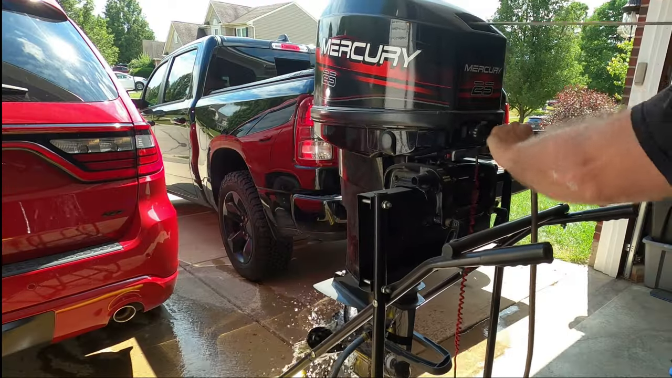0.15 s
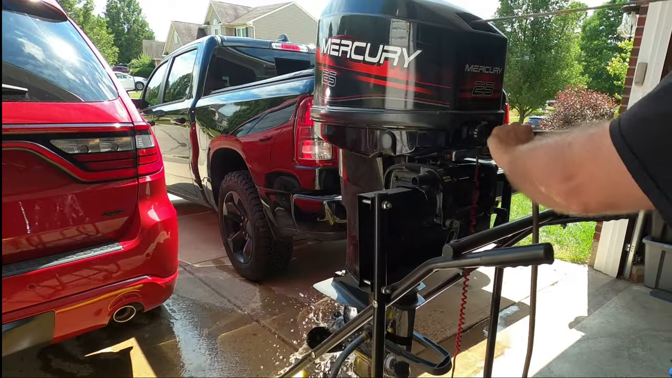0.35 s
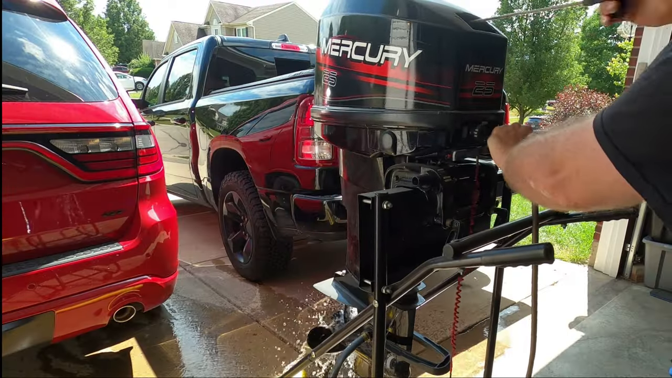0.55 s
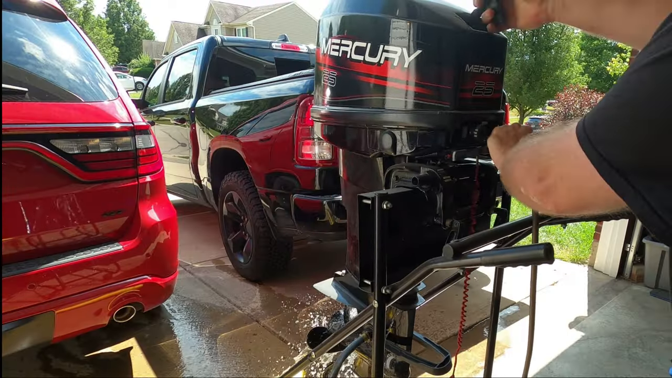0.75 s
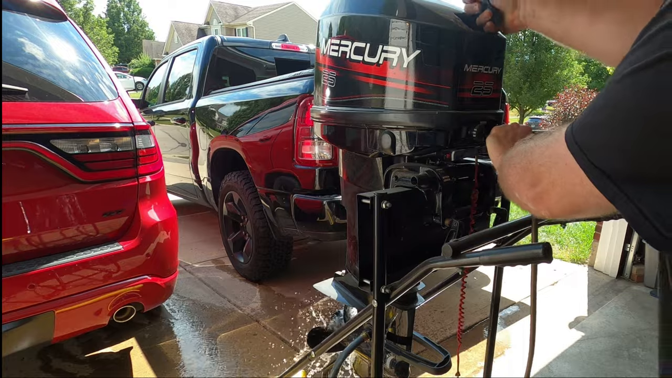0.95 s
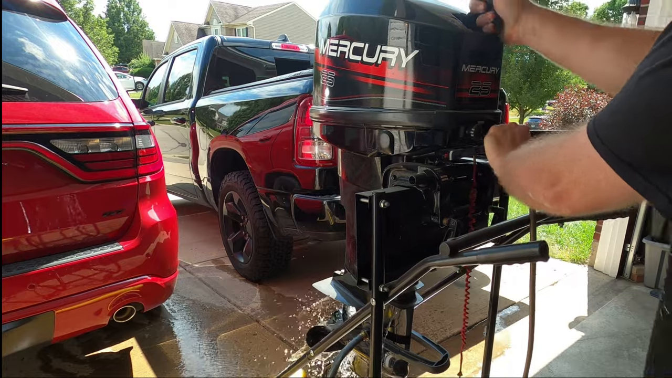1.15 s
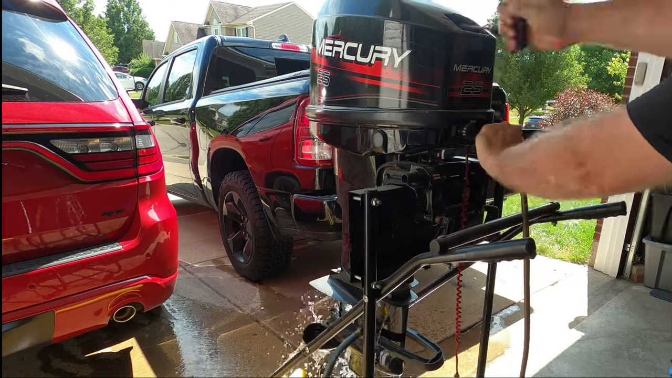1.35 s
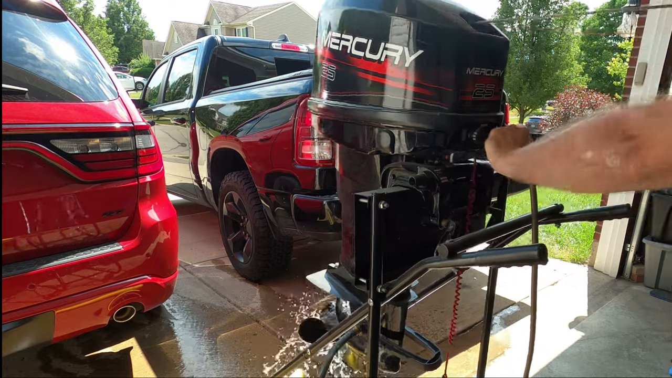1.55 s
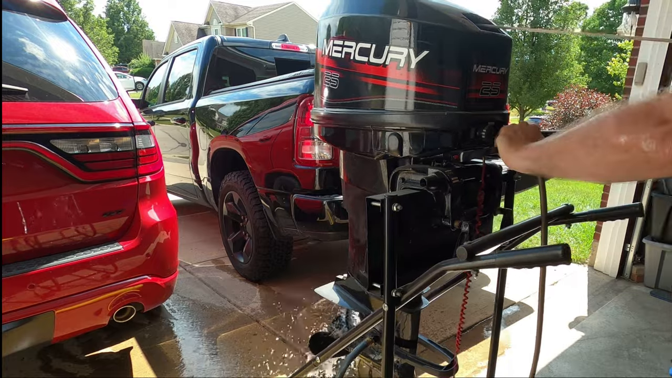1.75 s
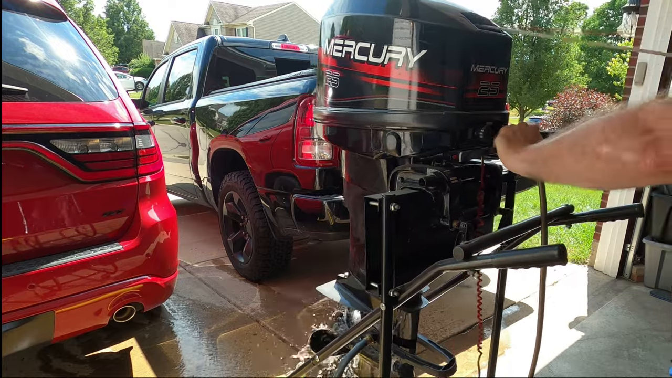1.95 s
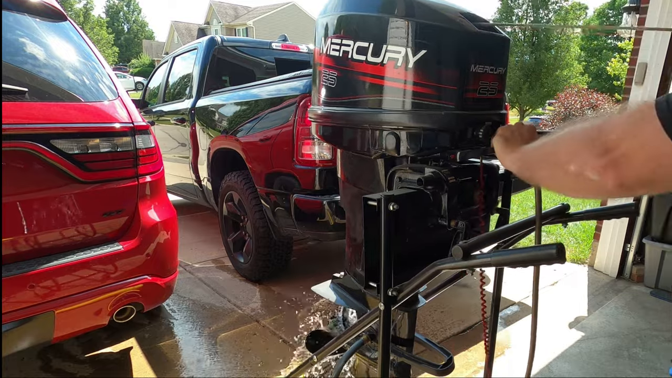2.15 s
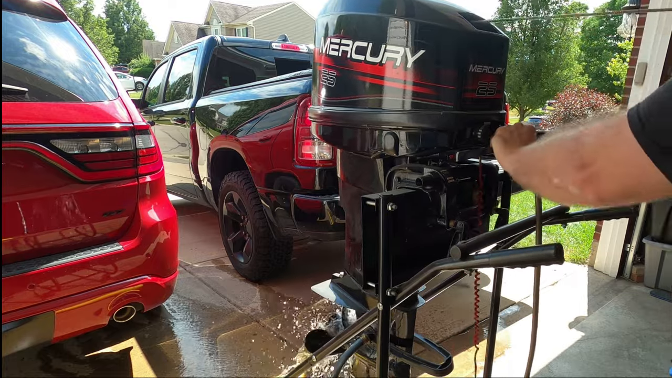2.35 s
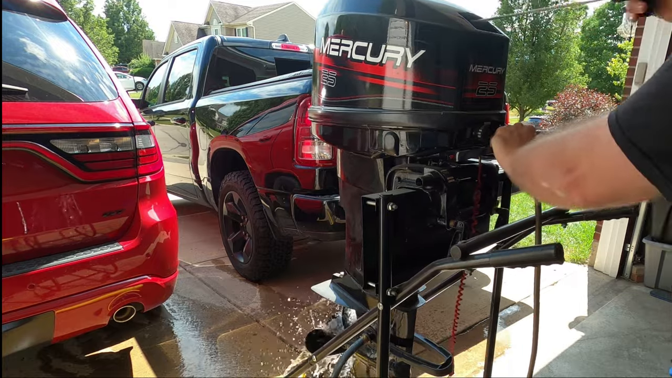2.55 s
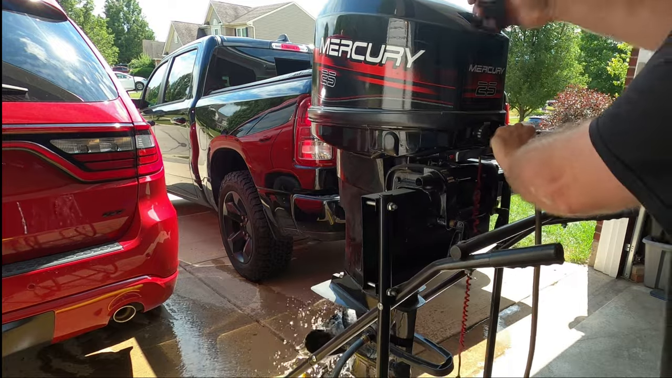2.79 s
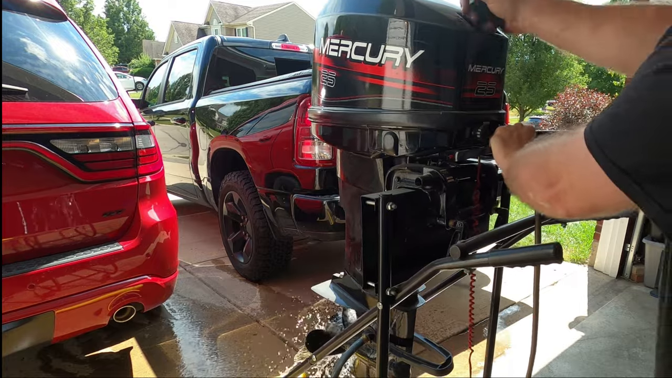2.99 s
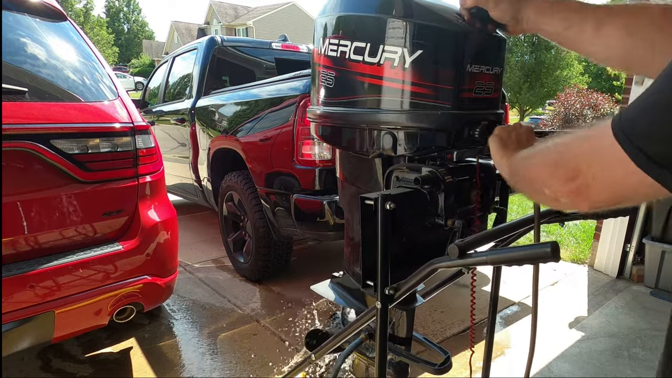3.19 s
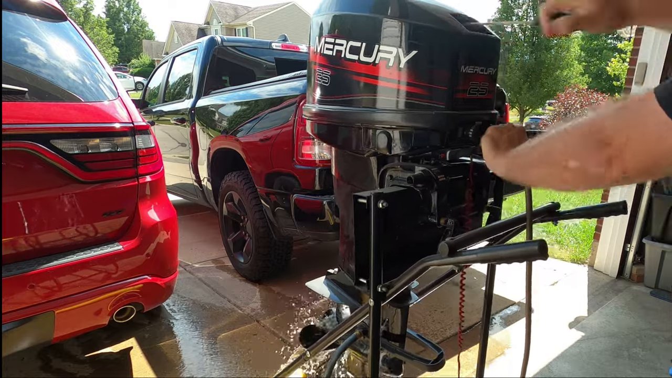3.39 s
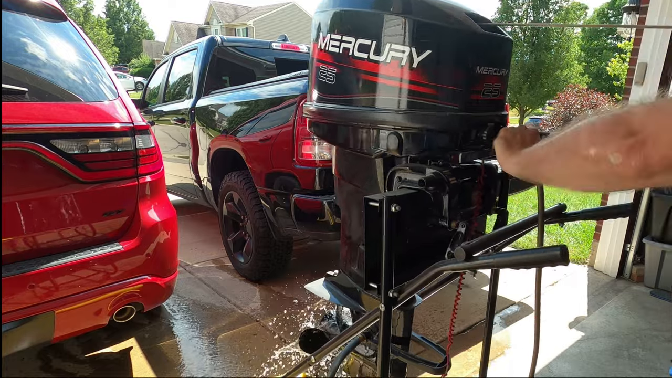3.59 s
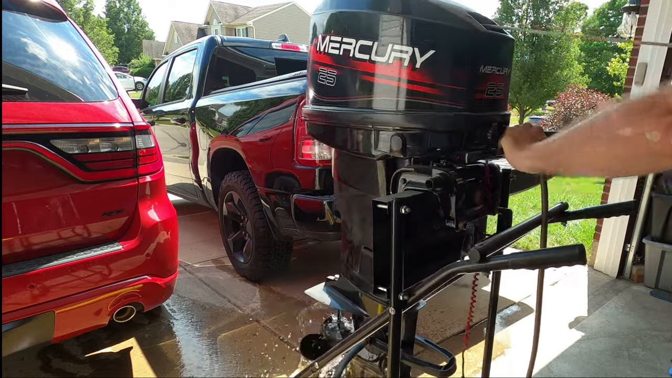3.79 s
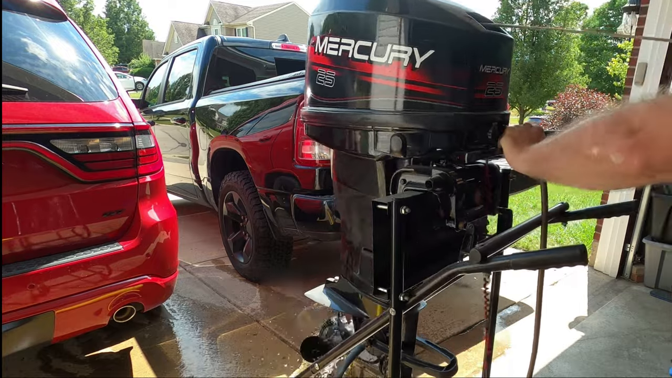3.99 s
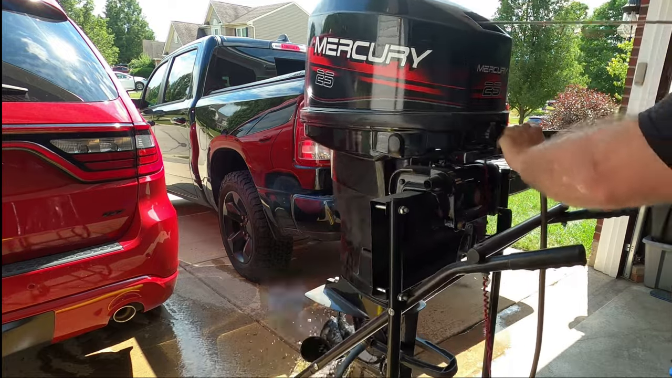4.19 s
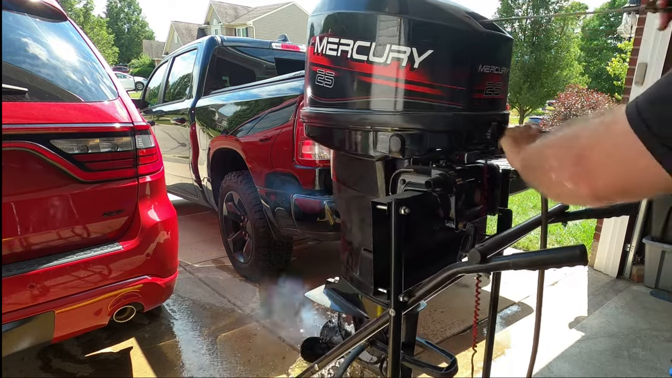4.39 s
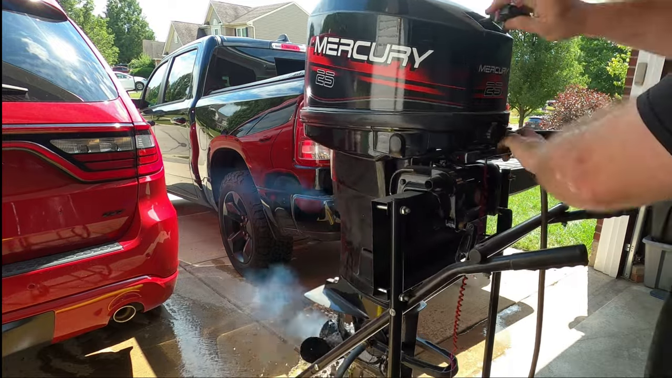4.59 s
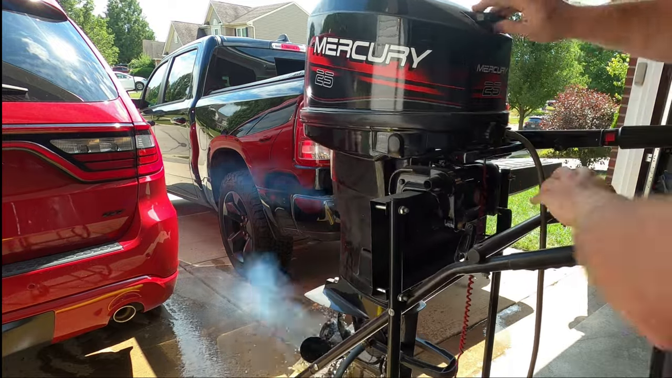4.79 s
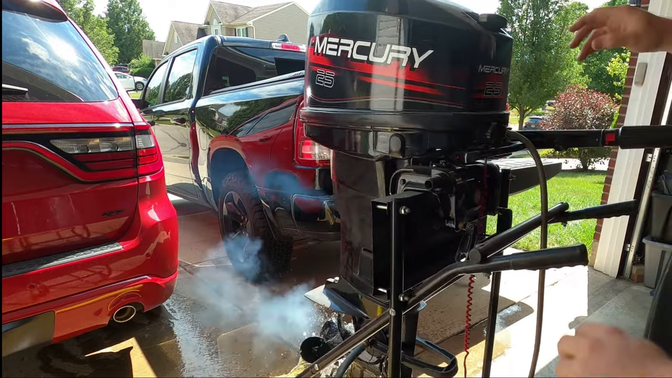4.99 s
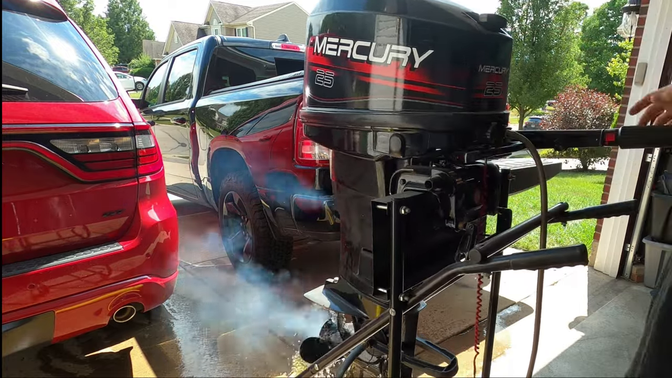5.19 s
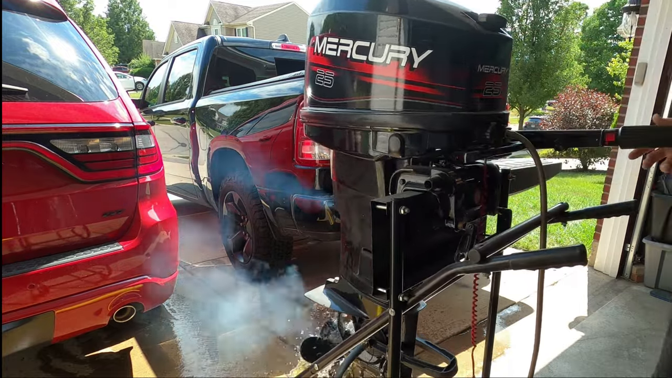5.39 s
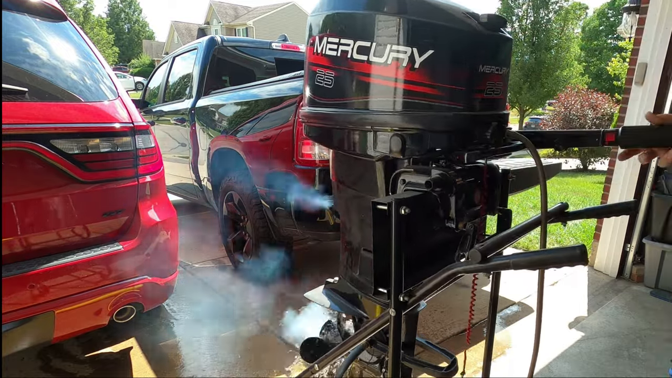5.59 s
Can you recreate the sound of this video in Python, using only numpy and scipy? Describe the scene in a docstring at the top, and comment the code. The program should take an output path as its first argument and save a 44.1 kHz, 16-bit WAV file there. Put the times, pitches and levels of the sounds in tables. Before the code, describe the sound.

Water hisses and splatters as an outboard motor's starter rope is pulled three times, until it fires and runs with a surging idle.

```python
"""A driveway by a garage, stereo microphones close to a two-cylinder two-stroke outboard on a stand.
Hose water sprays from the gear case and splatters on the concrete, over the low drone of the yard.
Two pulls on the starter rope thump, whirr and run down amid knocks and rattles; the third catches.
At idle the engine fires in short barking volleys that kick the speed up, and coasts on exhaust puffs
and gear clatter in between. The garage and parked cars answer briefly."""
import sys
import numpy as np
from scipy import signal
from scipy.fft import rfft, irfft, next_fast_len
from scipy.io import wavfile
from scipy.ndimage import map_coordinates

SR = 44100
rng = np.random.default_rng(int(sys.argv[2]) if len(sys.argv) > 2 else 0)


def digitize_waveform(pressure):
    """Quantize a signal to 16-bit integers and store it at the path in sys.argv[1].

    Rows of a 2-D input are taken as channels; values are limited to [-1, 1].
    """
    field = np.atleast_2d(pressure).T
    bounded = np.clip(field, -1, 1)
    quanta = np.round(bounded * 32767).astype(np.int16)
    wavfile.write(sys.argv[1], SR, quanta)


N = 248724
T = np.arange(N) / SR
AGE = T[:SR // 4]  # seconds into one short event

# Pulls on the rope, the first already under way. Each row: start in seconds, seconds until the crank
# rests or the engine takes over, strength in dB. Levels in all tables are relative.
PULLS = [(-0.497, 0.827, 0.5), (1.515, 0.88, -0.25), (3.505, 0.273, -1.4)]
# Volleys of firings. Each row: start in seconds, seconds from first to last firing, speed reached in
# puffs per second, bark in dB, metal ring in dB, ring pitch in Hz.
VOLLEYS = [(3.737, 0.068, 89.4, -12.5, -30, 3970), (4.106, 0.11, 98.25, -6, -27.5, 3770),
           (4.466, 0.1, 98.03, -6, -30, 3020), (4.724, 0.106, 100.9, -6, -31, 3134),
           (5.017, 0.102, 101.6, -5.5, -28.5, 3131), (5.305, 0.098, 101.2, -5, -28.5, 3218),
           (5.602, 0.093, 99, -20.5, -34.5, 2966)]
# Spectra of the exhaust and of the shaking mount. Each row: frequency in Hz, level in dB.
EXHAUST = [(12, -59), (30, -24.5), (60, -6), (135, 3.5), (170, -16), (225, -8.5), (255, -10.5), (290, -1),
           (385, -5), (440, 2.5), (490, -1.5), (560, -17.5), (660, -31.5), (1000, -22.5), (3000, -72)]
SHAKE = [(12, -52), (24, -13), (35, -3.5), (60, -4), (90, -0.5), (120, -13.5), (200, -44), (500, -63)]
# Resonances of the exhaust housing. Each row: frequency in Hz, width in Hz, level in dB.
HOUSING = [(218.7, 28, 12), (356, 17, -20), (430, 210, -8)]
# How alike the motor is at the two microphones. Each row: frequency in Hz, likeness from 0 to 1.
MOTOR_ALIKE = [(60, 1), (180, 0.96), (550, 0.96), (1650, 0.99), (4970, 0.17), (15000, 0.063)]

CATCH_S = VOLLEYS[0][0]
SPIN_UP_S, CRANK_HZ = 0.265, 21.0  # the rope's time to full speed, compressions per second by then


def amp(db):
    """Decibels to gain."""
    return 10 ** (np.asarray(db) / 20)


def unit(x):
    """Scale to rms 1."""
    return x / np.sqrt(np.mean(x ** 2) + 1e-20)


def along(points, hz):
    """Read (Hz, value) points on a log axis."""
    f, v = np.transpose(points)
    return np.interp(np.log(hz + 1), np.log(f + 1), v)


def curve(points):
    """Join (seconds, value) points into one value per sample."""
    return np.interp(T, *np.transpose(points))


def wobble(rate):
    """A smooth random curve, rate knots a second."""
    return map_coordinates(rng.standard_normal(int(N * rate / SR) + 4), [T * rate])


def add(track, s, sound):
    """Mix a sound in at time s."""
    i = max(round(s * SR), 0)
    track[..., i:i + sound.shape[-1]] += sound[..., :max(N - i, 0)]


def colour(x, spectrum, modes=()):
    """Causal filter: a smooth spectrum with resonances standing on it."""
    n = x.shape[-1]
    m = 2 * next_fast_len(n // 2 + 4096)
    hz = np.fft.rfftfreq(m, 1 / SR)
    peaks = sum(amp(db) / (1 + (2 * (hz - f) / width) ** 2) for f, width, db in modes)
    gain = amp(along(spectrum, hz)) * (1 + peaks)
    cepstrum = irfft(np.log(np.maximum(gain, 1e-6)))
    cepstrum[1:m // 2] *= 2  # folded for minimum phase
    cepstrum[m // 2 + 1:] = 0
    return irfft(rfft(x, m) * np.exp(rfft(cepstrum)), m)[..., :n]


def noise(spectrum, alike, modes=()):
    """Coloured stereo noise of rms 1, with the given left-right likeness."""
    m = 2 ** 18
    likeness = np.clip(along(alike, np.fft.rfftfreq(m, 1 / SR)), 0, 1)
    angle = np.arccos(likeness) / 2
    mid, side = irfft(rfft(rng.standard_normal((2, m))) * [np.cos(angle), np.sin(angle)])[:, :N]
    return unit(colour(np.array([mid + side, mid - side]), spectrum, modes))


def bursts(times, levels, t60, attack=0.0015):
    """An envelope that jumps at each time and dies away."""
    envelope = np.zeros(N)
    for s, db in zip(times, levels):
        add(envelope, s, amp(db - 60 * AGE / t60) * (1 - np.exp(-AGE / attack)))
    return envelope


def blow(spectrum, modes, puff_t60, puff_db):
    """A push with a puff of turbulence rings a body; as much energy as 10 ms at rms 1."""
    push = amp(puff_db - 60 * AGE / puff_t60) * rng.standard_normal(len(AGE))
    push[0] += 1
    sound = colour(push, spectrum, modes)
    return sound / np.linalg.norm(sound) * np.sqrt(SR / 100)


def alight(fade_s=0.014):
    """0 until the engine catches, then 1."""
    return np.clip(1 + (T - CATCH_S) / fade_s, 0, 1)


def after_catch(decay_s):
    """1 until the engine catches, then dying away."""
    return np.exp(-np.maximum(T - CATCH_S, 0) / decay_s)


def yard():
    """The low, steady drone of the yard behind everything."""
    # Each row: frequency in Hz, level in dB.
    drone = [(26, -51), (45, -1.5), (85, -10.5), (118, 3), (156, -5), (188, -4), (210, 3), (244, -9),
             (318, -12.5), (339, -19), (379, -14), (566, -25.5), (610, -23), (700, -42), (900, -30),
             (1170, -38), (1980, -120)]
    return noise(drone, MOTOR_ALIKE)


def walls(near):
    """Garage and parked cars answer briefly, differently at each microphone; long waves pass them by."""
    # Each row: frequency in Hz, seconds for the echo to fall 60 dB.
    decay_times = [(100, 0.13), (500, 0.68), (3000, 0.09), (12000, 0.029)]
    hz, t, bands = signal.stft(rng.standard_normal((2, SR // 3)), SR, nperseg=256)
    tail = signal.istft(bands * amp(-60 * t / along(decay_times, hz)[:, None]), SR, nperseg=256)[1]
    tail = colour(tail / np.linalg.norm(tail[0]), [(110, -24), (400, -7), (2000, 0)])
    delayed = np.pad(near, ((0, 0), (200, 0)))
    return signal.fftconvolve(delayed, tail, axes=1)[:, :N]


def flow_db(pump_db=3, blowout_db=11.5, thinning_db=-4.5):
    """Cranking pumps more spray; the first exhaust blows standing water out, then thins the stream."""
    # The hose's flow. Each row: time in seconds, level in dB.
    hose = [(0.0, -45), (0.42, -43.5), (1.06, -39.5), (1.83, -43.5), (2.05, -46.5), (2.85, -41.5),
            (3.48, -41.5)]
    crank_hz = sum(np.interp(T, *crank_speed(s, length), left=0, right=0) for s, length, _ in PULLS)
    exhaust_db = thinning_db + blowout_db * after_catch(0.22)
    return curve(hose) + 2 + pump_db * (crank_hz / CRANK_HZ) ** 2 + alight() * exhaust_db


def patter(count=6000, spread_db=6.5, drop_hz=3800, cycles=2.6):
    """Drops ping all over the puddle, each reaching the two microphones at different moments."""
    start, side = rng.random(count), rng.normal(0, .7, count)
    pitch, size = rng.standard_normal(count), rng.exponential(1, count)
    hz = np.clip(drop_hz * np.exp(.45 * pitch), 900, 11000)[:, None]
    t = T[:256]
    gain = amp(spread_db * np.minimum(size, 3))[:, None] * np.minimum(3000 / hz, 1)
    drops = gain * np.sin(2 * np.pi * hz * t) * np.exp(-hz * t / cycles)
    channels = []
    for mic in (-1, 1):
        samples = np.abs(start * N + mic * side * 3).astype(int)[:, None] + np.arange(len(t))
        channels.append(np.bincount(samples.ravel(), drops.ravel(), N)[:N])
    return unit(colour(np.array(channels), [(1000, -9.5), (4000, 6.0), (9500, 17), (15000, -8)]))


def water(mist_db=-4.5):
    """Hose water sprays from the gear case onto wet concrete; exhaust blows the drops into mist."""
    # The spray's hiss. Each row: frequency in Hz, level in dB.
    spray = [(350, -26), (600, -8.5), (788, -10), (1090, -5), (1180, 0.5), (1580, -0.5), (1960, -2.5),
             (2750, 1.5), (4370, 6), (4750, 2.5), (9630, -4.5), (12100, -11.5), (15500, -23)]
    # Each row: frequency in Hz, likeness at the two microphones from 0 to 1.
    spray_alike = [(60, 0.93), (180, 0.97), (550, 0.39), (1650, 1), (4970, 0.73), (15000, 0.16)]
    drops = patter()
    gobs = 2 * np.tanh(wobble(45) / 2)  # the stream falls in clumps
    drops *= amp(-1 + 1.1 * gobs + mist_db * alight())
    hiss = amp(-1.5 + 2.36 * gobs) * noise(spray, spray_alike)
    return amp(flow_db() + 0.89 * wobble(14)) * (hiss + drops)


def spatter(rows, width, t60, tail_db, tail_t60, snaps_per_s, ring_db, ring_t60, rise=0):
    """Each event is a sharp snap and a brief ring at its own pitch, trailed by scattered snaps."""
    out = np.zeros((2, N))
    for s, db, hz in rows:
        grit = rng.standard_normal(len(AGE)) + .55 * rng.standard_normal((2, len(AGE)))
        scatter = (rng.random(len(AGE)) < snaps_per_s / SR) * grit
        body = [(hz / 4, -40), (hz / width, -9), (hz, 0), (hz * width, -6), (hz * 3, -21), (hz * 6, -42)]
        snap = colour(amp(-60 * AGE / t60) * grit, body, [(hz, 300, -3)])
        tail = colour(amp(-60 * AGE / tail_t60) * scatter, body, [(hz, 300, -3)])
        glide = 1 + rise * np.minimum(AGE, ring_t60)
        ring = amp(-60 * AGE / ring_t60) * np.sin(2 * np.pi * hz * AGE * glide)
        add(out, s, amp(db - 32) * (unit(snap) + amp(ring_db) * unit(ring) + amp(tail_db) * unit(tail)))
    return out


def splats(lesser_count=8):
    """Water slaps the concrete until the engine catches; a bubble's pitch climbs as it surfaces."""
    # The loudest slaps. Each row: start in seconds, level in dB, pitch in Hz.
    loudest = [(0.1225, -19.5, 2650), (0.4524, -17, 2000), (0.7505, -21, 3000), (0.9645, -19, 3750),
               (1.0919, -20, 4120), (1.1236, -13.5, 2550), (1.2365, -21, 3080), (1.2725, -21, 4100),
               (1.4237, -23.5, 2120), (1.4516, -21, 2790), (2.1201, -27, 4040), (2.432, -24.5, 4500),
               (2.5357, -18, 2670), (2.608, -19.5, 4070), (2.8694, -19.5, 3160), (2.9174, -25.5, 1300),
               (3.02, -15, 2840), (3.1135, -20.5, 2860), (3.1695, -20, 2480), (3.2173, -16, 2410),
               (3.4328, -12.5, 2360), (3.473, -18.5, 4150), (3.5525, -18.5, 4200)]
    lesser = [(when * CATCH_S, -30 + 4 * size, 3500 * 2 ** (pitch - .5))
              for when, size, pitch in rng.random((lesser_count, 3))]
    return spatter(list(loudest) + lesser, width=1.41, t60=0.03, tail_db=0.5, tail_t60=0.27,
                   snaps_per_s=770, ring_db=-10, ring_t60=0.019, rise=3.1)


def rattles():
    """Metal strikes, rings and chatters; at 3.803 s and 4.465 s a firing rings and cracks sharply."""
    # Each row: start in seconds, level in dB, pitch in Hz.
    strikes = [(1.585, -28, 2470), (1.723, -19.5, 2370), (1.7656, -22, 1460), (1.8344, -18, 1990),
               (1.8453, -21, 2600), (1.8865, -21.5, 1960), (3.7862, -18, 1530), (3.803, -23, 5470),
               (3.8094, -18.5, 1434), (4.202, -25, 1560), (4.465, -23.5, 1850), (5.1082, -27, 1950)]
    return spatter(strikes, width=2.24, t60=0.039, tail_db=7.5, tail_t60=0.3,
                   snaps_per_s=2100, ring_db=4.5, ring_t60=0.051)


def knocks(jolt_db=-5):
    """Knocks and thuds: starter pawls bite in a stutter; each volley's first firing jolts the stand."""
    # Single knocks, and at 3.853 s the thud of the catching engine's fourth firing.
    # Each row: start in seconds, level in dB.
    singles = [(0.322, -22.5), (1.495, -16), (1.861, -4.5), (2.346, -24), (2.967, -17), (3.853, -9)]
    # The pawls' stutter. Each row: seconds into the pull, level in dB.
    stutter = [(0.0005, -1.5), (0.008, -6.5), (0.017, -7)]
    # The stand's spectrum. Each row: frequency in Hz, level in dB.
    stand = [(60, -19), (120, -13), (170, -4), (370, -3), (500, -12), (760, -12), (1400, -17), (2000, -22),
             (4000, -30.5), (7000, -51)]
    # Its resonances. Each row: frequency in Hz, width in Hz, level in dB.
    stand_modes = [(178, 34, 0), (382, 32, -2), (1040, 50, -2), (1355, 35, -1), (1630, 30, -2)]
    bites = [(s + delay, db + bite_db) for s, _, db in PULLS if s > 0 for delay, bite_db in stutter]
    jolts = [(s, db + jolt_db) for s, _, _, db, *_ in VOLLEYS]
    out = np.zeros(N)
    for s, db in bites + jolts + singles:
        add(out, s, amp(db - 12.5) * blow(stand, stand_modes, puff_t60=.075, puff_db=-10))
    return out


def crank_speed(start, length, friction_hz_per_s=38.6):
    """Times and compressions per second: the rope spins the crank up, friction slows it."""
    t = T[T < length]
    spin = CRANK_HZ * np.sin(np.pi / 2 * np.minimum(t / SPIN_UP_S, 1))
    return start + t, np.maximum(spin - friction_hz_per_s * np.maximum(t - SPIN_UP_S, 0), 0)


def cranking_db(age):
    """Levels of thump, chuff and whirr: they hold while the rope pulls, then fall away."""
    # Thump, chuff, whirr. Each row: level in dB, fall while coasting in dB per second.
    levels = [(-12, 27.5), (-18.5, 45), (-30.5, 34.5)]
    return [db - fall * np.maximum(age - SPIN_UP_S, 0) for db, fall in levels]


def strokes(thump_hz=73, sag_hz_per_s=30, rock_back_s=0.059):
    """One compression each half turn, deeper as the crank slows: (seconds, thump dB, chuff dB, Hz)."""
    rows = []
    for start, length, db in PULLS:
        t, rate = crank_speed(start, length)
        half_turns = np.floor(np.cumsum(rate) / SR)
        beats = [(s, db) for s in t[1:][np.diff(half_turns) > 0]]
        if rate[-1] == 0:  # the crank falls back from the compression that stops it
            beats.append((beats[-1][0] + rock_back_s, db + 1.5))
        for s, strength_db in beats:
            thump_db, chuff_db, _ = cranking_db(s - start)
            hz = thump_hz - sag_hz_per_s * max(s - start - SPIN_UP_S, 0)
            rows.append((s, strength_db + thump_db, strength_db + chuff_db, hz))
    return [row for row in rows if row[0] > 0]


def cranking(swell_s=0.015, fade_s=0.025, lead_s=0.03):
    """Under the rope each compression swells to a low thump, lets out a chuff and shakes the mount."""
    thumps = np.zeros(N)
    t = AGE - lead_s
    shape = np.exp(-(t / np.where(t < 0, swell_s, fade_s)) ** 2)
    beats = strokes()
    for (s, db, _, hz), detune in zip(beats, rng.standard_normal(40)):
        tone = np.cos(2 * np.pi * hz * (1 + 0.03 * detune) * (t + 0.0035))
        add(thumps, s - lead_s + 0.0044, amp(db - 2.5) * shape * tone)
    s, thump_db, chuff_db, _ = np.transpose(beats)
    shake = bursts(s - .015, thump_db - 6.5, t60=0.41, attack=0.0035) * noise(SHAKE, MOTOR_ALIKE)
    chuffs = bursts(s - .004, chuff_db, t60=0.1, attack=0.0011) * noise(EXHAUST, MOTOR_ALIKE, HOUSING)
    return thumps + shake + chuffs


def recoil_starter():
    """The starter whirrs unevenly through each pull and fades as the crank coasts."""
    # Each row: frequency in Hz, level in dB.
    whirr = [(76, -24), (130, 4), (229, -4.5), (275, -9.5), (428, -2), (538, -13), (617, -8), (2630, -20),
             (4290, -31), (5000, -32), (6500, -84), (11000, -120)]
    envelope = np.zeros(N)
    for start, length, db in PULLS:
        gate = np.interp(T - start, [0, .005, length, length + .03], [0, 1, 1, 0])
        envelope += gate * amp(db + cranking_db(T - start)[2])
    return envelope * amp(3.5 + 1.87 * wobble(110)) * noise(whirr, MOTOR_ALIKE)


def ignitions():
    """Three firings for every volley: (seconds, bark dB, metal ring dB, ring pitch Hz)."""
    # Each row: start as a share of the volley's length, bark in dB, metal ring in dB.
    pattern = [(0, -1, 2), (0.42, -1, 0), (1, 0.5, -1)]
    return [(s + share * length, db + bark_db, ring_db + metal_db, hz)
            for s, length, _, db, ring_db, hz in VOLLEYS for share, bark_db, metal_db in pattern]


def engine_speed(catch_hz=70.28, surge_s=0.045, drag_per_s=0.74):
    """Puffs per second: each volley kicks the speed up, drag lets it sag until the next."""
    points, peak_s, peak_hz = [], CATCH_S, catch_hz
    for s, length, hz, *_ in VOLLEYS:
        points.append((s, peak_hz * np.exp(-drag_per_s * (s - peak_s))))
        peak_s, peak_hz = s + length + surge_s, hz
        points.append((peak_s, peak_hz))
    return curve(points)


def exhaust(times, load, uneven=0.56):
    """Two unequal cylinders puff in turn through the housing; the gas is more turbulent under load."""
    sizes = 1 - uneven * (-1.) ** np.arange(len(times))
    pulses = np.bincount(np.clip(times * SR, 0, N - 1).astype(int), sizes, N)
    puffs = unit(colour(pulses, EXHAUST, HOUSING))
    gas = unit(bursts(times, np.zeros(len(times)), t60=0.08) * noise(EXHAUST, MOTOR_ALIKE, HOUSING))
    return puffs + (.22 + .85 * load) * gas


def boom(cycle, load, cold):
    """A low tone at the puff rate: it jerks under load, and limps while one cylinder is stronger."""
    phase = 2 * np.pi * cycle + (0.05 + 0.5 * load) * wobble(50)
    limp = 0.076 + 0.3 * cold
    return -np.sqrt(2) * (np.cos(phase) + limp * (np.cos(phase / 2) + np.cos(1.5 * phase)))


def clatter(times, levels_db):
    """A piston slaps once a turn, over gears that pulse with each puff and ring the cowl."""
    # Spectra of piston and gears. Each row: frequency in Hz, level in dB.
    piston = [(700, -32), (1300, -1), (2000, 4.5), (2600, -8.5), (4000, -8), (9000, -53)]
    gear_teeth = [(320, -10.5), (550, 7), (658, -2), (767, 1.5), (943, -8.5), (1410, 1.5), (1990, -10),
                  (2590, -8), (3140, -10.5), (3660, -22), (4260, -13.5), (12000, -42), (15000, -57)]
    # The cowl's resonances. Each row: frequency in Hz, width in Hz, level in dB.
    cowl = [(816, 120, 2.5), (1046, 43, 9.5), (1444, 24, 1), (1580, 17, 7), (1970, 31, 4), (3140, 32, 4)]
    slaps = unit(bursts(times[::2], levels_db[::2], t60=0.053) * noise(piston, MOTOR_ALIKE))
    pulsing = 2 + unit(bursts(times, levels_db, t60=0.043))
    gears = unit(pulsing * noise(gear_teeth, MOTOR_ALIKE, cowl))
    return gears + .45 * slaps


def running(settle_s=0.63):
    """The engine booms, puffs and clatters; each volley loads it and shakes the mount."""
    # Boom, exhaust, clatter. Each row: coasting level, change under load, change on catching, all in dB.
    layers = [(-15.5, -6.5, -3), (-21, 0, 2), (-30, 2, 3)]
    cycle = np.cumsum(engine_speed()) / SR
    count = np.arange(1, int(cycle[-1]))
    jitter, _, force = rng.standard_normal((3, 700))[:, :len(count)]
    fired = [s for s, *_ in ignitions()]
    load = np.tanh(bursts(fired, np.zeros(len(fired)), t60=0.37, attack=0.0043))
    cold = after_catch(settle_s)  # the first roughness wears off
    boom_db, exhaust_db, clatter_db = [db + loaded * load + fresh * cold for db, loaded, fresh in layers]
    times = np.interp(count, cycle, T)
    times += (.0001 + .0005 * np.interp(times, T, load)) * jitter
    out = amp(exhaust_db - 2) * exhaust(times, load)
    out += amp(boom_db) * boom(cycle, load, cold)
    out += amp(-24) * load * noise(SHAKE, MOTOR_ALIKE)
    out += amp(clatter_db - 2.5) * clatter(times, 2 * force)
    return alight() * out


def firings(ring_width_hz=300, ring_t60=0.18):
    """A charge that ignites barks down the exhaust, rasps, and rings the crankcase."""
    # Spectra of the bark and the metal rasp. Each row: frequency in Hz, level in dB.
    bark = [(12, -50), (26, -20), (40, -5.5), (80, 18), (160, -28), (230, -12.5), (350, 5), (470, 3),
            (600, -19.5), (1500, -38), (5000, -66)]
    metal = [(410, -26), (700, 3.5), (1210, 4), (1480, -5.5), (2280, -4), (3190, -6), (4350, -5.5),
             (5500, -8), (5940, -10.5), (12400, -20.5), (15500, -35)]
    # The crankcase's resonances. Each row: frequency in Hz, width in Hz, level in dB.
    crankcase = [(1570, 60, 4), (3220, 70, 9), (4050, 70, 0), (5080, 110, 5), (5500, 60, 2), (6450, 120, 5),
                 (8300, 250, 5)]
    out = np.zeros((2, N))
    for s, db, ring_db, ring_hz in ignitions():
        add(out, s, amp(db - 8) * blow(bark, HOUSING, puff_t60=0.059, puff_db=-20.5))
        grit = rng.standard_normal(len(AGE)) + 0.5 * rng.standard_normal((2, len(AGE)))
        rasp = unit(colour(grit, metal, crankcase + [(ring_hz, ring_width_hz, 3)]))
        # three close modes beat against each other
        ring = unit(sum(np.sin(2 * np.pi * ring_hz * rng.normal(1, .012) * AGE + phase)
                        for phase in rng.uniform(0, 2 * np.pi, (3, 2, 1))))
        envelope = amp(ring_db + 1 - 60 * AGE / ring_t60) * (1 - np.exp(-AGE / 0.0013))
        add(out, s, envelope * (rasp + .45 * ring))
    return out


def scene():
    """Motor and water close by, their short echo, and the yard behind."""
    motor = running() + firings() + cranking() + recoil_starter() + knocks() + amp(4.5) * rattles()
    near = motor + amp(3) * splats() + water()
    drone = amp(-42) * yard()
    return near + amp(-11) * walls(near) + drone


def record(dry, lag_s=.000013, top_hz=15500):
    """The left microphone is a little louder and later; both lose the highest treble."""
    # Each row: frequency in Hz, left minus right in dB.
    balance = [(60, 2), (120, 2.5), (240, 2), (480, 2.0), (950, 1.5), (1890, 2.5), (3770, 4), (7520, 2.0),
               (15000, 0)]
    m = next_fast_len(N + SR // 4)
    hz = np.fft.rfftfreq(m, 1 / SR)
    sides = np.array([[.5], [-.5]])
    microphones = amp(sides * along(balance, hz)) * np.exp(-2j * np.pi * hz * sides * lag_s)
    band = (hz < top_hz) / np.sqrt(1 + (hz / 14600) ** 30)
    fade_out = np.minimum((T[-1] - T) / .005, 1)
    return irfft(rfft(dry * fade_out, m) * microphones * band, m)[:, :N]


dry = scene()
out = record(dry)
digitize_waveform(out)
```